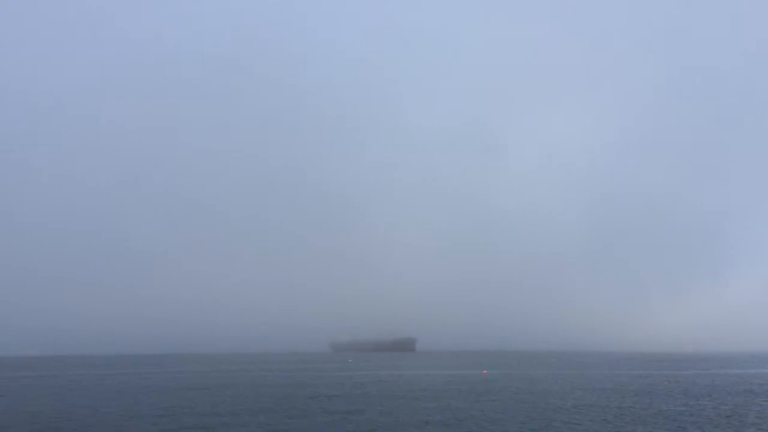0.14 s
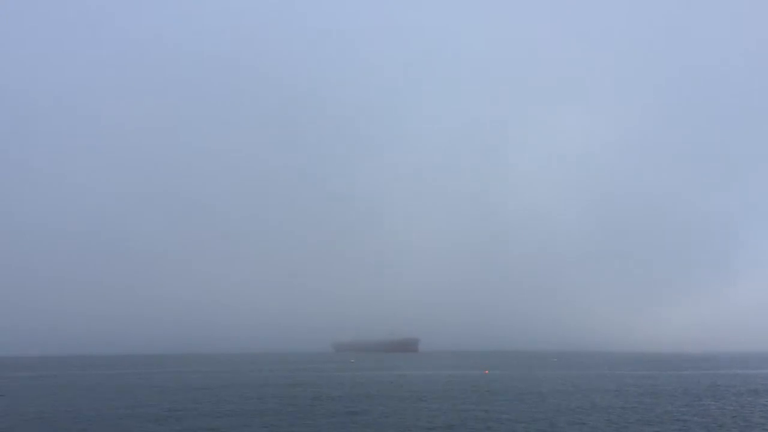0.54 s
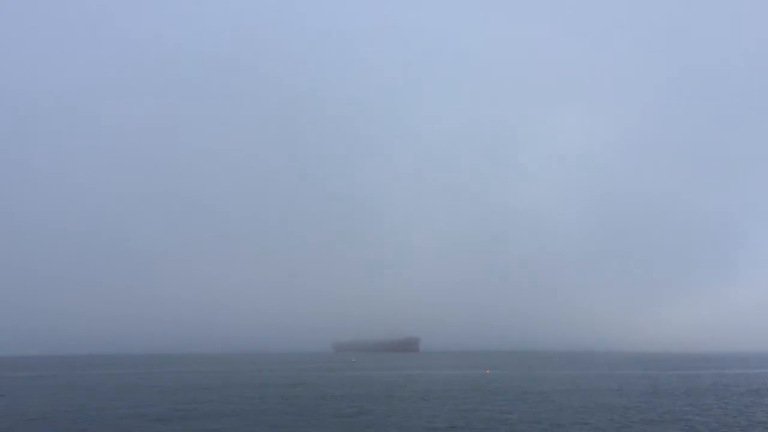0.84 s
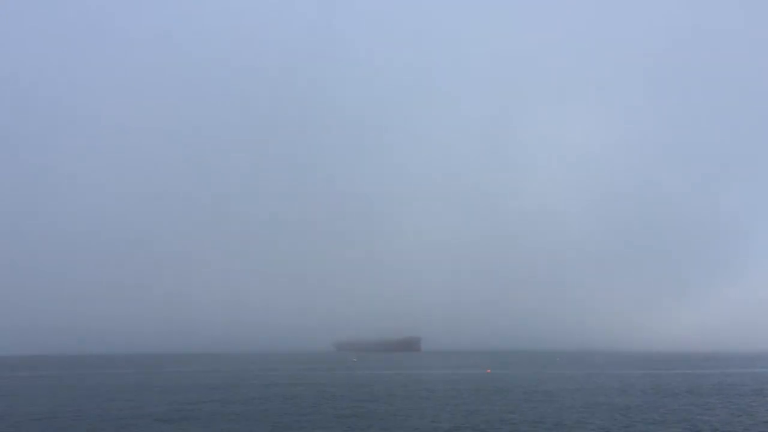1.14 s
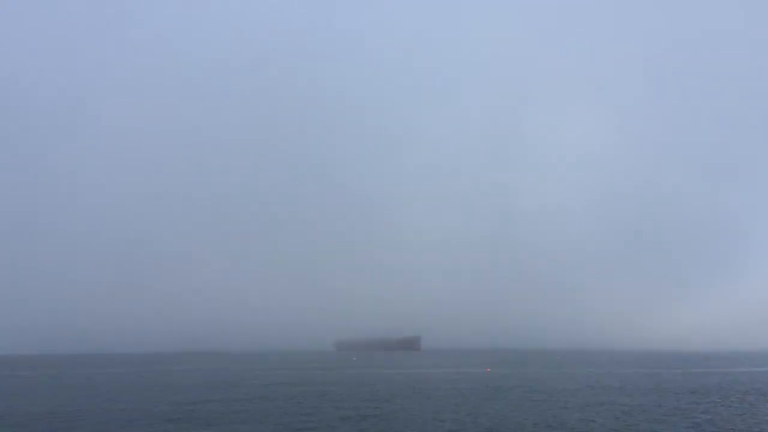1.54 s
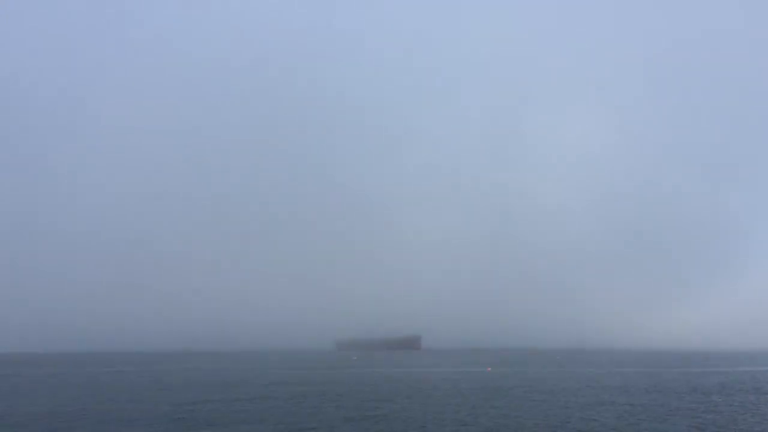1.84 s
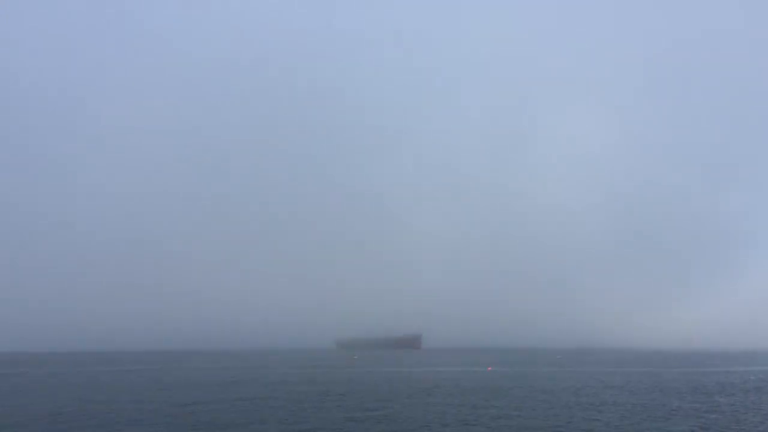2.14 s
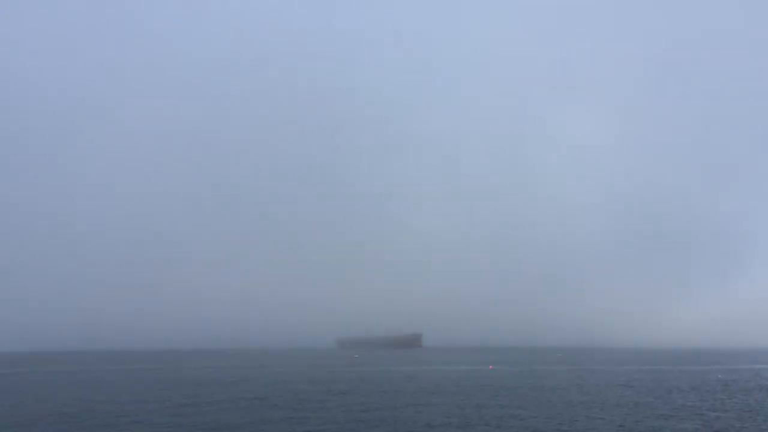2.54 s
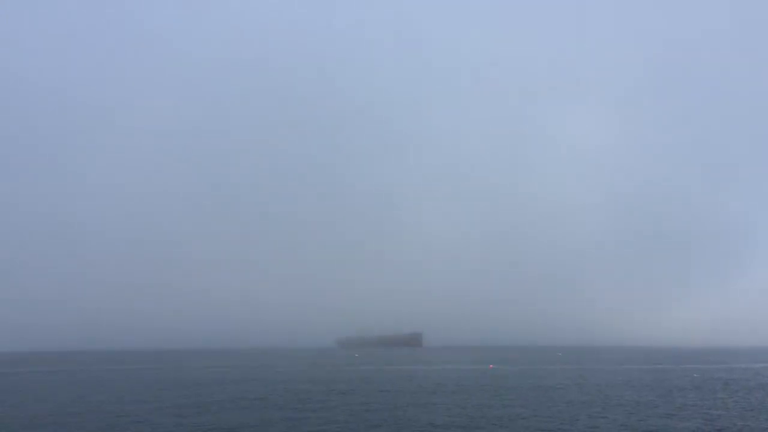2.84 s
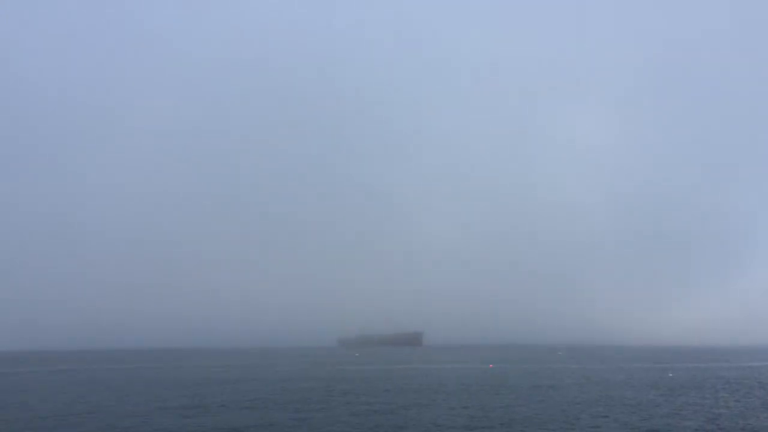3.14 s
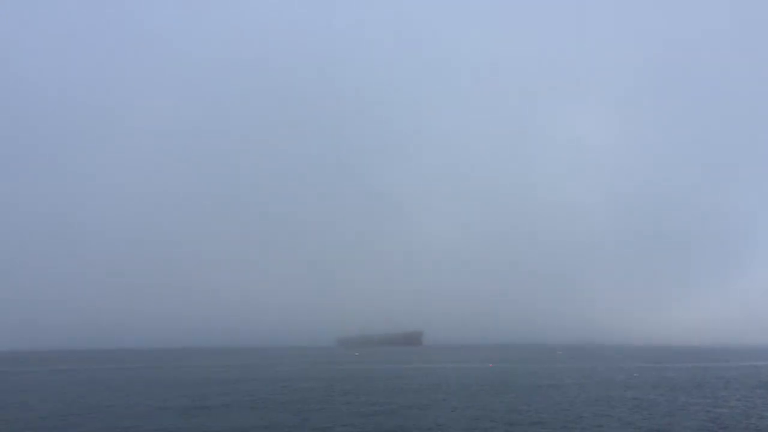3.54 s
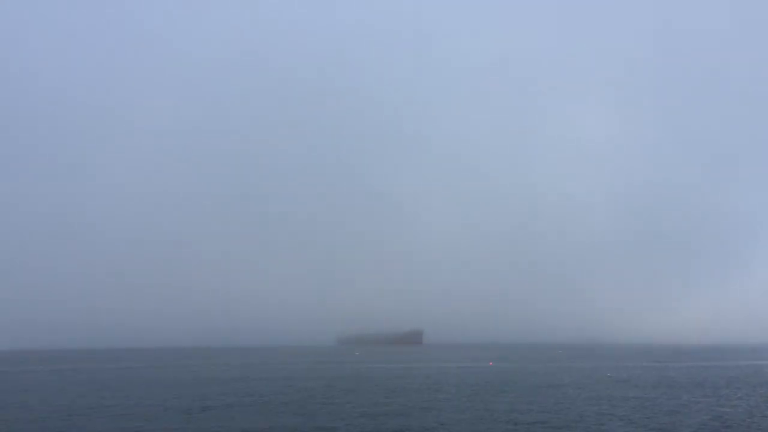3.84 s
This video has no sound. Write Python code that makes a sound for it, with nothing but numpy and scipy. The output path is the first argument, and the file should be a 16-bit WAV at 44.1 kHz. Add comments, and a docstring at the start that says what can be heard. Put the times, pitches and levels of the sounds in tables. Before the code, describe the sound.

One steady deep ship horn sounds far off at the end, after gusty wind and sea wash

```python
"""A windy shore in fog: a ship far out starts one long, steady horn blast that sounds to the end.
The horn is a train of sharp pulses, built from overtones that fade in and out on the way over the water.
Wind on the microphone is shaped noise that rumbles and flutters, with deep buffets, flurries and thumps.
Behind it are two flickering noises: the wash of the sea and a swelling hiss of wind with tiny ticks."""
import sys
import numpy as np
from scipy import signal
from scipy.fft import rfft, irfft
from scipy.io import wavfile
from scipy.ndimage import uniform_filter1d

SR = 44100
rng = np.random.default_rng(int(sys.argv[2]) if len(sys.argv) > 2 else 0)


def to_wav(sig):
    """Store sig (one row per channel, or 1-D mono) as 16-bit WAV at the path in sys.argv[1].

    Samples outside -1..1 are clipped; the rate is SR.
    """
    pcm = np.clip(np.atleast_2d(sig), -1, 1) * 32767
    pcm = np.round(pcm).astype(np.int16)
    wavfile.write(sys.argv[1], SR, pcm.T)  # frames by channels


N = 176400  # length in samples: 4 s

# Horn pitch, which starts sharp, sags and settles: (time [s], pitch [Hz])
HORN_PITCH = [(3.145, 166), (3.17, 162.7), (3.21, 161.6), (3.31, 160.5), (3.43, 161.8), (3.62, 162.25),
              (4.0, 162.6)]
# Horn loudness: (time [s], level [dB])
HORN_LEVEL = [(3.17, -33), (3.3, -35.5), (3.56, -37.5), (3.73, -38), (3.87, -41), (4.0, -39.5)]
# Strength of the overtones as the blast opens: (multiple of the pitch, level [dB])
HORN_OPENING = [(1, -2), (2, -9), (3, 1), (4, -2), (5, -2), (6, -2), (7, -7.5), (8, -8.5), (9, -15),
                (10, -19), (11, -26), (14, -36), (20, -46)]
# Strength of the overtones once it has settled: (multiple of the pitch, level [dB])
HORN_SETTLED = [(1, 1.5), (2, -8), (3, 0), (4, 1), (5, -5.5), (6, -4.5), (7, -5.5), (8, -13), (9, -18),
                (10, -13.5), (11, -14), (12, -21), (14, -35), (20, -46)]
# Brief fades of groups of overtones:
# (time [s], half length [s], centre [Hz], half width [Hz], depth [dB])
OVERTONE_FADES = [(3.36, .05, 970, 70, 5), (3.455, .022, 810, 70, 9), (3.472, .022, 1135, 80, 17),
                  (3.444, .02, 1370, 130, 25), (3.525, .028, 1690, 130, 11), (3.605, .025, 1460, 70, 18),
                  (3.635, .022, 1295, 70, 17), (3.55, .12, 1940, 130, 10)]
HORN_START_S, HORN_ATTACK_S = 3.141, .026
SETTLE_FROM_S, SETTLE_TO_S = 3.48, 3.53
# Random shimmer in loudness, stronger for high overtones; the rate [Hz] is how fast it wanders
SHIMMER_DB, SHIMMER_DB_PER_KHZ, SHIMMER_RATE_HZ = .8, .6, 16
# Shared starting angle of the overtones, and their random drift in timing
HORN_SKEW_RAD, HORN_WAVER_RAD_PER_KHZ = .75, .16

# Rumble of the wind on the microphone: (time [s], level [dB])
GUST_LEVEL = [(0, -46), (.26, -53), (.32, -42.5), (.4, -50), (.66, -45), (.8, -34), (.92, -48), (1.1, -43),
              (1.21, -35.5), (1.31, -45), (1.46, -44), (1.65, -39), (1.8, -43), (2.0, -35.5), (2.24, -36.5),
              (2.28, -39), (2.48, -29.5), (2.69, -33.5), (2.92, -31.5), (3.08, -35), (3.18, -34),
              (3.42, -39), (3.6, -30), (3.77, -33.5), (3.88, -32), (4.0, -43)]
# Tone of the rumble: (frequency [Hz], level in each Hz [dB])
RUMBLE_SPECTRUM = [(28, -15), (45, -1.5), (65, 1.5), (100, 1.5), (160, -5.5), (220, -12.5), (300, -34),
                   (500, -51), (1000, -64.5)]
# Flutter of strong gusts, above the rumble: (time [s], level [dB])
FLUTTER_LEVEL = [(0, -53), (1.8, -71), (2.02, -43.5), (2.3, -67), (2.47, -39), (2.58, -41.5), (2.7, -50),
                 (2.9, -45), (2.98, -39), (3.06, -51.5), (3.2, -29.5), (3.32, -27.5), (3.4, -35),
                 (3.52, -31), (3.7, -37.5), (3.84, -27.5), (3.9, -41)]
# Tone of the flutter: (frequency [Hz], level in each Hz [dB])
FLUTTER_SPECTRUM = [(70, -9.5), (150, 3.5), (220, -3.5), (320, -8), (500, -7), (700, -19.5), (1000, -28),
                    (3000, -68)]
# Random swings in loudness, before the slow ones are evened out
EDDY_RATE_HZ, RUMBLE_SWING_DB, FLUTTER_SWING_DB = 45, 2.5, 3.3

# Deep buffets of large eddies: (time [s], peak level [dB], frequency [Hz])
BUFFETS = [(.775, -30, 155), (.8, -28, 70), (.845, -30, 150), (2.74, -25, 70), (1.61, -30, 120),
           (1.904, -23, 75), (1.99, -21, 100), (2.03, -25, 94), (2.073, -25, 94), (2.462, -24, 200),
           (2.8, -22, 60), (2.862, -25, 90)]
BUFFET_CYCLES = 0.7  # half length of a buffet, in cycles
# Short flurries of turbulence: (time [s], half length [s], level [dB], centre [Hz])
FLURRIES = [(2.193, .01, -36, 534), (2.24, 0.0092, -47, 1450), (2.643, 0.0085, -26, 282),
            (2.828, 0.0026, -34, 395), (2.999, 0.0068, -24, 333), (3.253, 0.0052, -34.5, 447),
            (3.648, 0.0084, -31.5, 405), (3.748, 0.012, -22.5, 390), (3.806, 0.0091, -28, 416),
            (3.836, 0.0041, -32, 377)]
# Rounding of the spectrum's peak [octaves], and its fall on either side [dB per octave]
FLURRY_WIDTH_OCT, FLURRY_SLOPE_DB = 0.89, 26.5
# Single eddies that thump the microphone: (time [s], level [dB], half width [ms])
THUMPS = [(.7475, -28, 1.1), (2.538, -27, .6), (2.587, -28, .6), (2.633, -20, .9), (2.643, -23, .27),
          (2.808, -20, .75), (2.882, -27, .55), (2.9773, -24, .47), (3.0025, -10, .42), (3.1468, -16, .9),
          (3.2095, -16, 1.0), (3.5555, -20, 1.0), (3.736, -20, .45), (3.7713, -15, 1.4),
          (3.8028, -14.5, .55), (3.8078, -17, .45)]
SUCTION = .35  # how far each thump leans towards suction
SNAP_DB, SNAP_SHARE = -19, .33  # level and width of the snap, against its thump

# Tone of the sea: (frequency [Hz], level in each Hz [dB])
SEA_SPECTRUM = [(100, -14), (280, 7.5), (420, 4), (600, 1), (1000, 1), (1500, 0.5), (2200, -4), (3200, -14),
                (14000, -33.5)]
# Loudness of the sea: (time [s], level [dB])
SEA_LEVEL = [(0, -54), (.55, -48), (1.0, -52), (2.0, -50.5), (2.23, -45.5), (2.45, -54), (2.95, -46),
             (3.3, -46.5), (3.6, -58.5), (4.0, -46)]
# Tone of the wind's hiss: (frequency [Hz], level in each Hz [dB])
HISS_SPECTRUM = [(500, -8.5), (1500, -5), (2500, 4.5), (3500, 2.5), (5000, 0.5), (7000, -1.5), (9500, -6.5),
                 (12000, -9.5), (15000, -13)]
# Loudness of the hiss and its ticks: (time [s], level [dB])
HISS_LEVEL = [(0, -66), (.5, -56.5), (.9, -60.5), (1.83, -61), (1.9, -54), (2.1, -56.5), (2.23, -53.5),
              (2.33, -63), (2.52, -62), (2.61, -55), (2.85, -53.5), (3.2, -60), (3.37, -63.5),
              (3.44, -68.5), (3.66, -66.5), (3.685, -57), (3.74, -52), (3.82, -58.5), (3.94, -60),
              (4.0, -50.5)]
TICK_COUNT, TICK_LOW_HZ, TICK_HIGH_HZ = 90, 2500, 13000
# Smallest tick against the hiss, random spread above it, and time from start to peak
TICK_DB, TICK_SPREAD_DB, TICK_RISE_MS = 4, 3.7, .16

LOW_CUT_HZ, TOP_HZ = 32, 15300


def undb(db):
    """Turn decibels into a gain."""
    return 10 ** (np.asarray(db) / 20)


def unit(x):
    """Scale a signal to an average (rms) level of 1."""
    return x / np.sqrt(np.mean(x ** 2) + 1e-18)


def curve(rows, at):
    """Read a two-column table, with straight lines between its rows."""
    return np.interp(at, *np.array(rows, float).T)


def bins():
    """Frequencies of the spectrum, in octaves above 1 Hz."""
    return np.log2(np.maximum(np.arange(N // 2 + 1) * SR / N, 1))


def colour(x, spectrum):
    """Filter a signal by a table of levels over frequency, then scale it to an rms of 1."""
    hz, db = np.array(spectrum, float).T
    gain = undb(np.interp(bins(), np.log2(hz), db))
    return unit(irfft(rfft(x) * gain, N))


def walk(rate):
    """Smooth random wander: noise with only its slow part kept, at an rms of 1."""
    slow_part = np.exp(-(2 ** bins() / rate) ** 2)
    return unit(irfft(rfft(rng.standard_normal(N)) * slow_part, N))


def steady(x, span_s):
    """Even out the slow chance swells of a noise, so that the level tables set its loudness."""
    span = int(span_s * SR)
    power = uniform_filter1d(uniform_filter1d(x ** 2, span), span)
    return x / np.sqrt(power + 1e-9)


def horn(t):
    """Overtones locked in step make one sharp pulse a cycle; each shimmers, wavers and fades in moving air."""
    pitch = curve(HORN_PITCH, t)
    phase = 2 * np.pi * np.cumsum(pitch) / SR
    settled = np.clip((t - SETTLE_FROM_S) / (SETTLE_TO_S - SETTLE_FROM_S), 0, 1)
    fades = []
    for at, half, centre, width, depth in OVERTONE_FADES:
        dip = depth * np.exp(-abs((t - at) / half) ** 3)
        fades.append((dip, centre, width))
    pulses = np.zeros(N)
    for k in range(1, 21):
        hz = k * pitch[-1]
        khz = hz / 10 ** 3
        db = (1 - settled) * curve(HORN_OPENING, k) + settled * curve(HORN_SETTLED, k)
        # A fade bites deepest into the overtones nearest its centre
        db -= sum(dip * np.exp(-((hz - centre) / width) ** 2) for dip, centre, width in fades)
        db += (SHIMMER_DB + SHIMMER_DB_PER_KHZ * khz) * walk(SHIMMER_RATE_HZ)
        waver = HORN_WAVER_RAD_PER_KHZ * khz * walk(SHIMMER_RATE_HZ)
        pulses -= undb(db) * np.cos(k * phase + HORN_SKEW_RAD + waver)
    attack = np.clip((t - HORN_START_S) / HORN_ATTACK_S, 0, 1)
    # The root of 2 brings a sine wave to an rms of 1
    return np.sqrt(2) * pulses * attack * undb(curve(HORN_LEVEL, t))


def buffeting(t):
    """Wind on the microphone: a deep rumble and a flutter above it, both surging with the same eddies."""
    eddies = walk(EDDY_RATE_HZ)
    rumble = colour(rng.standard_normal(N), RUMBLE_SPECTRUM) * undb(RUMBLE_SWING_DB * eddies)
    flutter = colour(rng.standard_normal(N), FLUTTER_SPECTRUM) * undb(FLUTTER_SWING_DB * eddies)
    rumble = steady(rumble, span_s=0.078)
    flutter = steady(flutter, span_s=0.051)
    return rumble * undb(curve(GUST_LEVEL, t)) + flutter * undb(curve(FLUTTER_LEVEL, t))


def buffets(t):
    """Large eddies rock the microphone: short, deep waves that swell and die within a few cycles."""
    out = np.zeros(N)
    for (at, db, hz), turn in zip(BUFFETS, rng.random(len(BUFFETS))):
        cycles = (t - at) * hz
        swell = np.exp(-.5 * (cycles / BUFFET_CYCLES) ** 2)
        out += undb(db) * swell * np.cos(2 * np.pi * (cycles + turn))
    return out


def flurries(t):
    """Brief, brighter bursts of turbulence: noise gathered around one frequency."""
    out, octaves = np.zeros(N), bins()
    for at, half, db, hz in FLURRIES:
        # A peak with a rounded tip and even slopes on both sides
        shape = undb(-FLURRY_SLOPE_DB * np.hypot(octaves - np.log2(hz), FLURRY_WIDTH_OCT))
        noise = unit(irfft(rfft(rng.standard_normal(N)) * shape, N))
        burst = np.exp(-.5 * ((t - at) / half) ** 2)
        out += undb(db) * steady(noise, span_s=0.028) * burst
    return out


def eddy(u):
    """Pressure of one passing eddy: a push, then a harder suck, with u in half widths from its middle."""
    return -(u + SUCTION) * np.exp(.5 * (1 - u ** 2))


def thumps(t):
    """Each eddy pushes on the microphone, then sucks harder, with a faint, narrower snap at its core."""
    out = np.zeros(N)
    for at, db, half_ms in THUMPS:
        u = (t - at) * 10 ** 3 / half_ms
        snap = undb(SNAP_DB) * eddy(u / SNAP_SHARE)
        out += undb(db) * (eddy(u) + snap)
    return out


def wash(spectrum, flicker_db, rate):
    """Noise split into overlapping octave bands that each flicker on their own."""
    noise, octaves = rfft(rng.standard_normal(N)), bins()
    mixed = np.zeros(N)
    for k in range(6, 15):  # bands centred from 64 Hz to 16384 Hz
        band = irfft(noise * np.maximum(1 - abs(octaves - k), 0), N)
        mixed += band * undb(flicker_db * walk(rate))
    return colour(mixed, spectrum)


def sea(t):
    """Waves wash in the distance: flickering noise that swells and sinks."""
    return wash(SEA_SPECTRUM, flicker_db=2.2, rate=31) * undb(curve(SEA_LEVEL, t))


def hiss(t):
    """Wind hisses in swells and carries the ticks with it."""
    air = wash(HISS_SPECTRUM, flicker_db=1.95, rate=53)
    return (air + ticks(t)) * undb(curve(HISS_LEVEL, t))


def ticks(t):
    """Tiny, high ticks, as of fine spray: a few cycles each, at random times and pitches."""
    out, age = np.zeros(N), t[:N // 400]
    for when, pitch, size in rng.random((TICK_COUNT, 3)):
        hz = TICK_LOW_HZ * (TICK_HIGH_HZ / TICK_LOW_HZ) ** pitch
        # Most ticks are small; the largest are three spreads above the smallest
        db = TICK_DB - TICK_SPREAD_DB * np.log(max(size, np.exp(-3)))
        u = age * 10 ** 3 / TICK_RISE_MS
        start = int(when * (N - len(age)))
        tick = u * np.exp(1 - u) * np.sin(2 * np.pi * hz * age)
        out[start:start + len(age)] += undb(db) * tick
    return out


def scene():
    """Add the horn, the wind and the sea together, in mono."""
    t = np.arange(N) / SR
    wind_on_microphone = buffeting(t) + buffets(t) + flurries(t) + thumps(t)
    return (horn(t) + wind_on_microphone + sea(t) + hiss(t))[None]


def record(dry):
    """Thin out the deepest bass with a gentle filter and cut the top with a very steep one."""
    low_cut = signal.butter(2, LOW_CUT_HZ, "high", fs=SR, output="sos")
    top_cut = signal.ellip(12, .1, 80, TOP_HZ, fs=SR, output="sos")
    thinned = signal.sosfiltfilt(low_cut, dry)
    return signal.sosfilt(top_cut, thinned)


dry = scene()
out = record(dry)
to_wav(out)
```